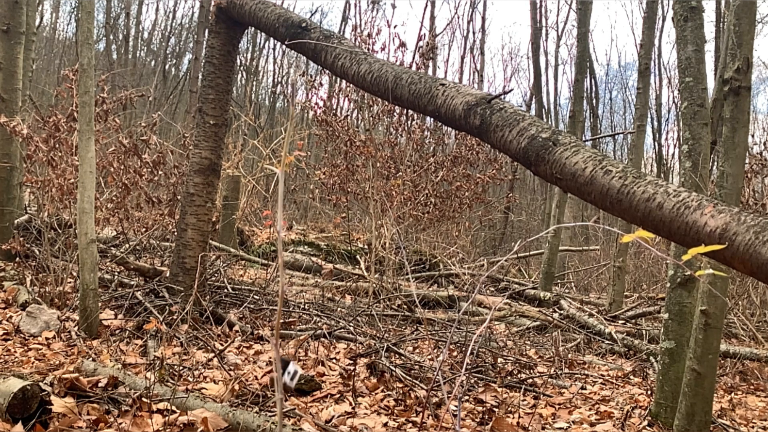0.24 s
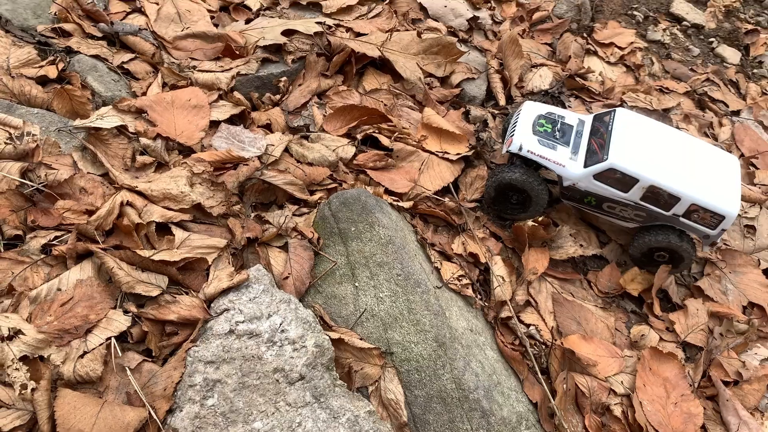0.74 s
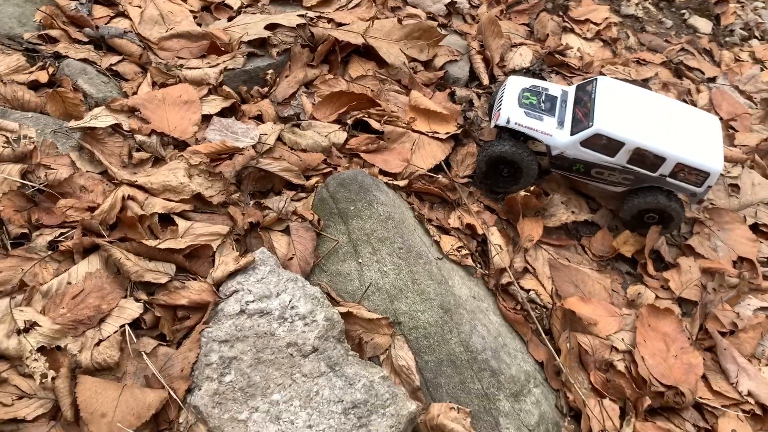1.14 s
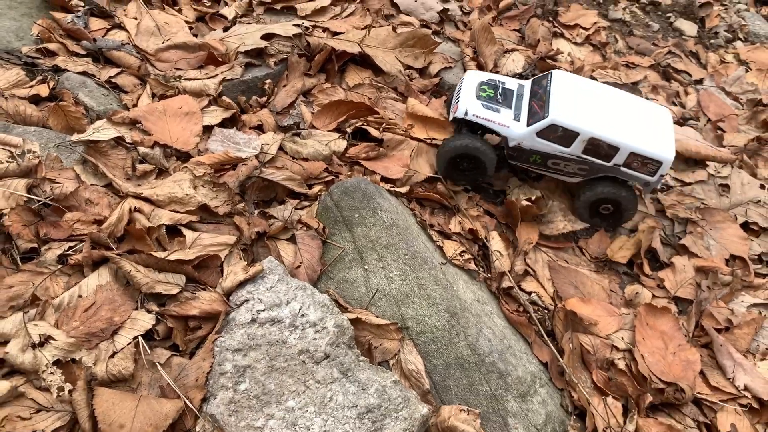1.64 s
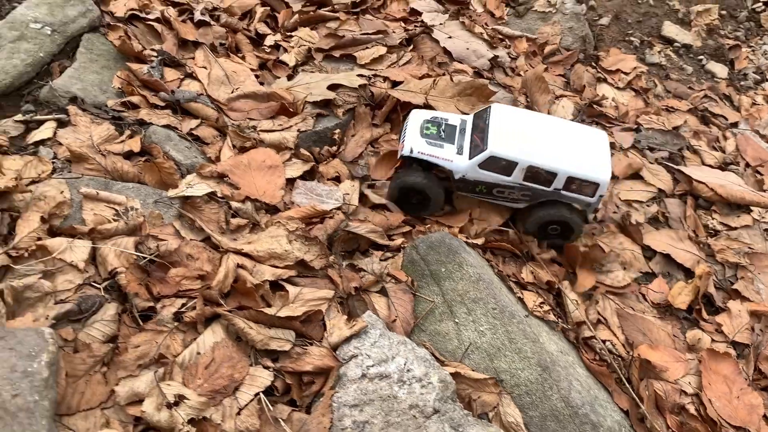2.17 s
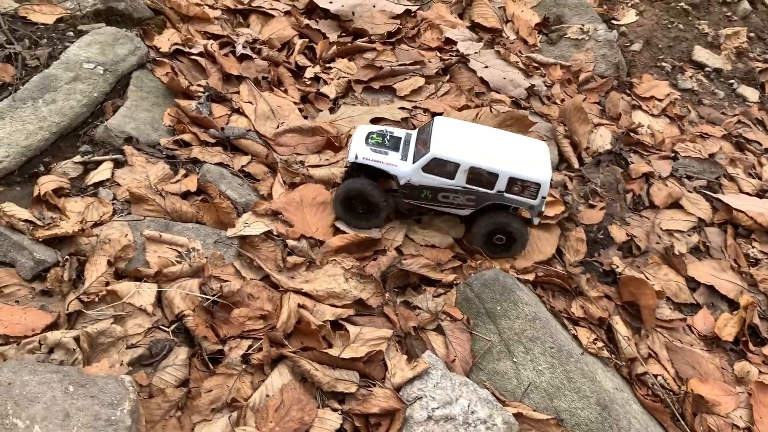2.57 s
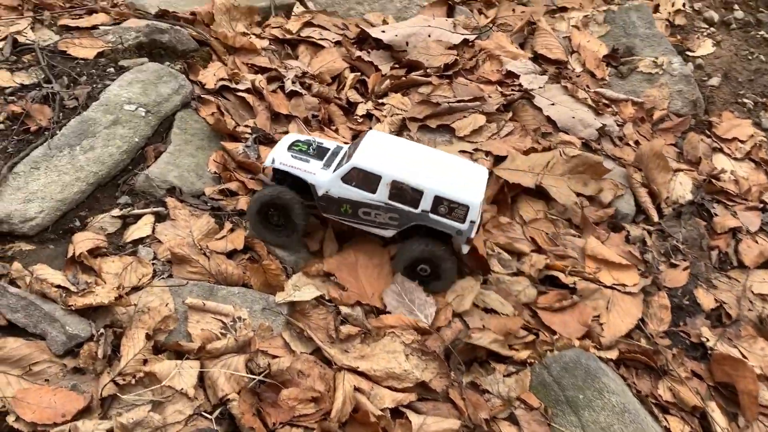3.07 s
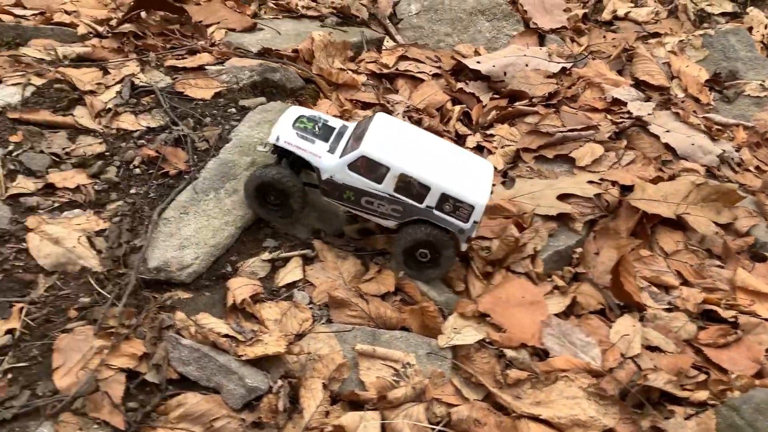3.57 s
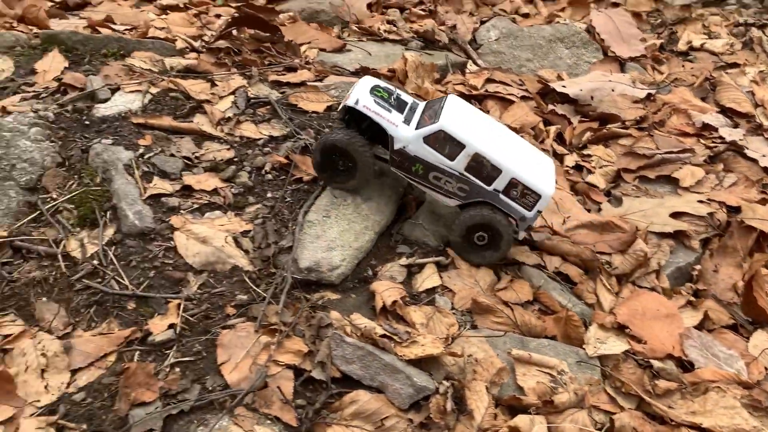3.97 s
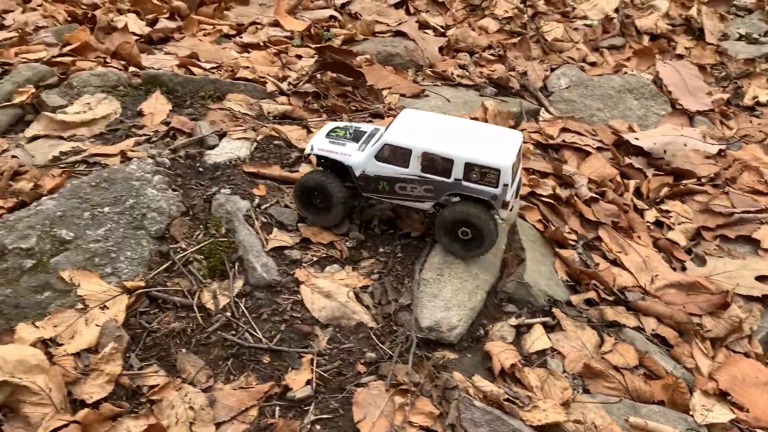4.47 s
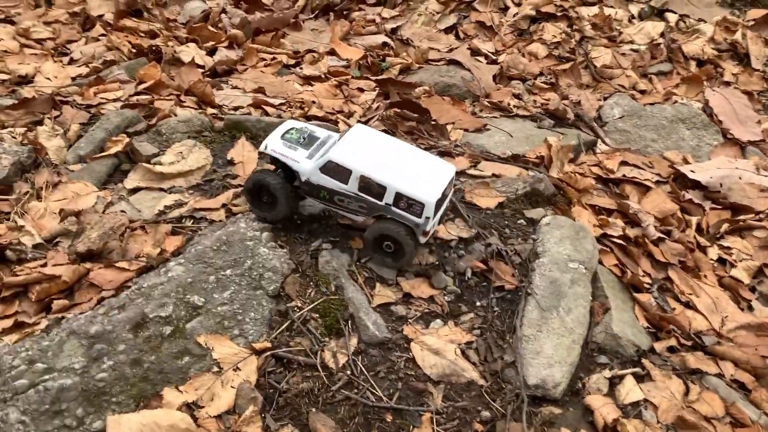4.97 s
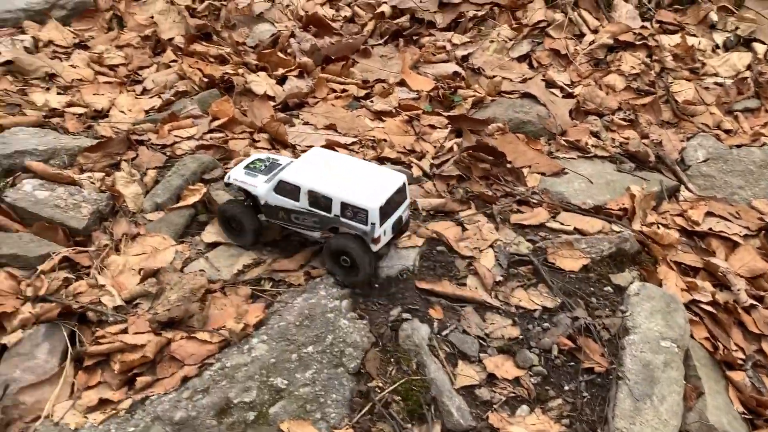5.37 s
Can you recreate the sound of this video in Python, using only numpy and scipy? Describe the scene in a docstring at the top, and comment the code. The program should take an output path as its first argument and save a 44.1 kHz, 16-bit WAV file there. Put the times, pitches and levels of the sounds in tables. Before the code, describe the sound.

A small remote-controlled truck whines and rasps as it crawls over crackling dry leaves and knocks against stones, over a low hum.

```python
"""First comes a soft gust among the trees, then a low engine-like hum and a few scuffs in the leaves.
Close by, a small radio-controlled truck sets off and crawls over dry leaves and stones. Its steering
squeals, its speed controller sings and its gear teeth whine and rasp. Motor speed sets the pitch and
strength of the whine and how hard the tyres crush the leaves. The wheels plough through leaf drifts
and thud on the ground, and the plastic chassis knocks on rock."""
import sys
import numpy as np
from scipy import signal
from scipy.fft import rfft, irfft, next_fast_len
from scipy.io import wavfile
from scipy.ndimage import uniform_filter1d, map_coordinates

SR = 44100
rng = np.random.default_rng(int(sys.argv[2]) if len(sys.argv) > 2 else 0)


def to_wav(s):
    """Save 16-bit WAV."""
    ch = np.atleast_2d(s).T  # columns
    pcm = np.round(np.clip(ch, -1, 1) * 32767)  # PCM
    wavfile.write(sys.argv[1], SR, pcm.astype(np.int16))


N = 247401
T = np.arange(N) / SR

# A COLOUR table says how strong the low and high parts of a sound are: pitch_hz, level_db
TREE_COLOUR = [(35, -48), (60, -7), (134, -2), (150, -13.5), (248, -5.5), (319, -11.5), (362, -10.5),
               (392, -13), (822, -9), (1060, -18), (1380, -7), (1670, -18.5), (1930, -12), (2440, -30),
               (2600, -102.5), (3380, -101), (5720, -120)]  # wind in the trees
BUFFET_COLOUR = [(4, 2.0), (10, 2.0), (25, -9.5), (60, -42.0), (200, -87)]  # air rocking the microphone
HUSH_COLOUR = [(25, -8), (70, 22), (200, 9), (450, -5.5), (620, -3.5), (800, 4), (1300, -3.5), (1700, -2),
               (2400, -16), (4000, -14.5), (6300, -22.5), (10000, -30.5), (15000, -33)]  # the quiet wood
RUMBLE_COLOUR = [(25, -32), (45, -11), (70, 16.5), (100, 0), (150, -0.5), (200, -1), (245, 5), (290, -4),
                 (350, -6), (440, -16), (900, -62)]  # rumble under the hum
LEAF_COLOUR = [(300, -52), (1500, -12), (4000, -33.5), (5600, -6), (6700, -2), (9000, 0.5), (11000, 0.5),
               (13000, 5), (14400, 1.5), (15500, 8), (15900, 1.5)]  # dry leaves breaking
SCRUB_COLOUR = [(100, -26), (400, 16), (800, 14), (1200, 4), (1600, 11), (2300, 12.5), (3000, 9.5),
                (3700, 10), (4700, 12.5), (5500, 12.5), (8000, -3), (16000, -40)]  # tyres rubbing over leaves
WHINE_COLOUR = [(500, 11), (1200, 24), (1750, 23.5), (2400, 22), (3000, 21.5), (3500, 20), (4100, 11),
                (4400, 15), (6000, -8), (16000, -18)]  # how the truck's shell gives off the whine
HISS_COLOUR = [(300, -53), (2400, -45), (3600, -13), (4400, -38), (4900, -16.5), (6800, -2), (7500, -3.5),
               (8000, 1), (8400, 0.5), (9000, 7.5), (10000, -3), (11000, -5), (16000, -6)]  # sliding gear teeth
SIZZLE_COLOUR = [(3000, -35), (7500, -23), (9500, -21), (10700, 18.5), (12000, -3), (13200, 7), (16000, 1)]  # fast-running teeth
CLATTER_COLOUR = [(300, -33), (750, -12.5), (1000, -4), (1220, 5.5), (1500, -8), (1800, -4), (2300, -48),
                  (2800, -64), (3600, -31), (4400, -35), (4900, -6), (7000, -14)]  # the hollow gearbox
# what the left side gains and the right side loses
LEFT_COLOUR = [(300, 0.92), (800, -0.85), (2200, 1.0), (3600, 0.74), (6500, 0.12), (16000, -0.14)]
# how the two microphone openings hear the truck: pitch_hz, left_lead_rad, likeness (0 to 1)
MIC_OPENINGS = [(100, 0, .9), (650, -1, .5), (1200, -.2, .9), (2100, -1.55, .6), (2900, -2.2, .6),
                (3450, -4.3, .55), (4200, -6, .35), (5200, -10.5, .4), (6200, -12.4, .55),
                (8000, -10.9, .92), (9200, -9.8, .99), (9700, -9.42, .997), (10200, -9, .99),
                (11000, -8.2, .93), (13000, -6.3, .92), (16000, -3.6, .84)]

HUM_LEVELS = [(0.62, -36.5, -42.5, -44.5), (1.15, -40, -43, -46), (1.9, -41.5, -47.5, -58.5),
              (2.8, -40.5, -55.5, -90), (3.9, -38.5, -51.5, -54.5), (4.6, -54.5, -50, -53.5),
              (5.61, -51, -50, -56.5)]  # parts of the hum: time_s, first_tone_db, second_tone_db, rumble_db
HOLLOW_TONES = [(243, -21), (284, -8.5)]  # overtones of the hum: pitch_hz, against_rumble_db
SERVO_TONES = [(4027, -64), (8054, -86), (13600, -70)]  # the steering squeal: pitch_hz, level_db
CONTROLLER_LEVEL = [(1.28, -71), (1.42, -53.5), (1.8, -52), (2.3, -58), (3.9, -59.5), (4.5, -57),
                    (5.61, -60)]  # the speed controller's song: time_s, level_db

SCUFFS = [(0.618, -71, -56), (0.844, -63, -53.5), (1.096, -58.5, -59), (1.28, -66, -56)]  # faint stirs in the leaves before setting off: peak_s, crush_db, scrub_db
LEAF_DRIFTS = [(1.412, 0.042, -50.5, -53), (1.663, 0.021, -29, -64), (2.163, 0.48, -36.5, -52),
               (2.263, 0.14, -31.5, -36.5), (2.453, 0.049, -47, -45.5), (2.663, 0.14, -33, -43.5),
               (2.884, 0.059, -30.5, -36.5), (3.337, 0.14, -32, -52), (3.527, 0.13, -42, -35),
               (4.06, 0.13, -36.5, -57), (4.548, 0.15, -34, -69), (5.001, 0.023, -36, -32.5),
               (5.137, 0.16, -38, -41.5)]  # wheels in piles of leaves: middle_s, half_length_s, crush_db, scrub_db
LEAF_SNAPS = [(0.841, -45), (0.868, -49), (1.343, -51), (1.4296, -24), (1.6233, -19.5), (1.646, -30),
              (1.658, -26), (1.6634, -22), (1.7528, -21), (1.832, -16.5), (1.896, -16), (1.936, -19.5),
              (2.022, -18), (2.103, -19), (2.151, -17), (2.315, -17), (2.6267, -13), (2.854, -17),
              (2.892, -10.5), (2.968, -16), (3.081, -25), (3.258, -16), (3.3605, -10), (4.151, -22),
              (4.8655, -20), (4.996, -12), (5.1515, -14)]  # leaves and twigs snapping: start_s, level_db
# tyres and chassis hitting the ground: start_s, level_db, pitch_hz, fade_s (time to fall by 60 dB)
THUDS = [(0.845, -32.5, 109, 0.086), (1.098, -31.5, 417, 0.0047), (2.869, -23, 460, 0.032),
         (2.872, -27, 329, 0.019), (2.875, -26.5, 118.5, 0.071), (3.429, -33.5, 486, 0.018),
         (3.435, -21.5, 164, 0.039), (3.544, -22.5, 179, 0.04), (3.694, -27.5, 313, 0.0096),
         (4.967, -28.5, 281, 0.026), (4.986, -27.5, 146, 0.083), (5.004, -27, 127, 0.047),
         (5.009, -23, 472, 0.0091), (5.01, -21, 88, 0.11)]
STONE_KNOCKS = [(0.854, -32, 3500), (1.102, -29, 590), (3.5364, -4.5, 9900), (3.539, -18, 2540),
                (3.6931, -8.5, 1340), (3.692, -11.5, 12000), (4.986, -22, 1180), (4.999, -25, 1000)]  # the chassis hitting stone: start_s, level_db, brightness_hz
CHASSIS_TONES = [(460, -11.5, 0.014), (700, -10.5, 0.019), (1060, 6, 0.0086), (1210, -5.5, 0.018),
                 (1870, 2, 0.023), (2210, 18, 0.0025), (3810, 9, 0.0034), (4960, 11.5, 0.011),
                 (5500, -8, 0.0026)]  # how the struck chassis rings: pitch_hz, level_db, fade_s

GEAR_PITCH = [(1.392, 995), (1.432, 1086), (1.507, 1693), (1.556, 1423), (1.626, 1255), (1.711, 1266),
              (1.806, 1151), (1.901, 1412), (1.936, 1683), (1.971, 1735), (2.035, 2048), (2.085, 2060),
              (2.125, 2330), (2.185, 2204), (2.23, 2255), (2.265, 2122), (2.295, 1874), (2.315, 1858),
              (2.355, 1972), (2.395, 1920), (2.484, 2057), (2.559, 2388), (2.609, 2350), (2.724, 1872),
              (2.784, 2057), (2.819, 2320), (2.859, 2425), (2.928, 2151), (2.983, 2424), (3.108, 2284),
              (3.218, 2327), (3.263, 2813), (3.307, 3079), (3.352, 2536), (3.392, 2650), (3.437, 2360),
              (3.472, 1830), (3.487, 1796), (3.667, 1698), (3.712, 1523), (3.786, 1758), (3.901, 1753),
              (3.936, 1635), (3.981, 1775), (4.016, 1760), (4.066, 2010), (4.106, 2014), (4.161, 2238),
              (4.176, 2140), (4.205, 1724), (4.26, 1773), (4.3, 1411), (4.36, 1873), (4.395, 1858),
              (4.435, 2189), (4.49, 2374), (4.57, 2863), (4.639, 3054), (4.704, 2496), (4.784, 2645),
              (4.829, 2470), (4.874, 2660), (4.909, 2383), (5.014, 2295), (5.039, 2375), (5.068, 2624),
              (5.108, 2507), (5.148, 2776), (5.213, 2730), (5.258, 2840), (5.288, 2816), (5.323, 2514),
              (5.343, 2470), (5.393, 2542), (5.473, 3170), (5.522, 2428), (5.562, 2660), (5.612, 2305)]  # motor speed, as the rate at which gear teeth meet: time_s, pitch_hz
SLACK_MOMENTS = [(3.63, 0.047, 15), (4.302, 0.015, 4.5)]  # a wheel hangs in the air: middle_s, half_length_s, drop_db
CASING_RINGS = [(3080, 200, -6), (3430, 240, 0), (3680, 170, -3), (4020, 240, -13)]  # where the gearbox casing rings: pitch_hz, width_hz, level_db
CASING_LEVEL = [(1.5, -50.5), (1.62, -55), (1.85, -54), (1.96, -50), (2.06, -39.5), (2.14, -44.5),
                (2.25, -41), (2.5, -52), (3.0, -44), (3.3, -44), (3.75, -50), (3.9, -58), (4.1, -44.5),
                (4.19, -45.5), (4.24, -49), (4.29, -49), (4.34, -44), (4.44, -46.5), (4.58, -38),
                (4.82, -51.5), (5.1, -41.5), (5.6, -49)]  # the casing's grinding: time_s, level_db
CHATTER_TONES = [(2, 0), (3, -4.5)]  # overtones that shake the casing: gear_pitch_multiple, level_db
HISS_LEVEL = [(1.43, -45.5), (1.51, -38.5), (1.57, -44.5), (1.85, -42.5), (2.0, -41.5), (2.27, -35),
              (2.38, -38), (2.44, -36), (2.6, -36.5), (2.9, -33), (3.06, -32.5), (3.45, -35), (3.75, -38.5),
              (3.97, -34.5), (4.08, -43), (4.19, -35), (4.57, -36), (4.63, -38.5), (4.7, -32.5),
              (4.8, -42.5), (4.92, -35.5), (5.1, -39), (5.38, -48.5), (5.6, -39.5)]  # gear hiss as the truck lurches and turns: time_s, level_db
GEARBOX_RINGS = [(4910, 160, -11), (5420, 150, -13), (7850, 300, -3), (8200, 340, 0)]  # high rings set off by sliding teeth: pitch_hz, width_hz, level_db
SQUEAK_RING = [(4330, 220, 0)]  # a thin ring in the drive: pitch_hz, width_hz, level_db
SQUEAK_LOUDNESS = [(1.44, -51.5), (1.56, -50.5), (1.68, -59), (2.3, -56), (3.1, -52), (3.9, -49),
                   (4.6, -52.5), (5.6, -68)]  # strength of that ring: time_s, level_db
WHINE_TONES = [(1, 0), (2, -8), (3, -14)]  # the whine and its overtones: gear_pitch_multiple, level_db
# extra tones from the off-centre pinion (the motor's small gear): offset_in_turn_rates, level_db
SIDE_TONES = [(-3, -15), (-1, -17), (1, -7.5), (3, -23)]
CRUISE_WHINE_LEVEL = [(1.5, -55), (1.65, -45.5), (1.8, -50), (1.98, -50.5), (2.2, -60.5), (2.8, -52.5),
                      (3.1, -47), (3.35, -45), (3.85, -44), (4.25, -47.5), (4.5, -46.5), (4.85, -47),
                      (5.4, -46)]  # the whine's strength at cruising speed: time_s, level_db

CRUISE_HZ, PINION_TEETH = 2000, 9  # gear pitch at cruising speed; teeth on the motor's gear


def amp(db):
    """Turn decibels into a number to multiply by."""
    return 10 ** (np.asarray(db) / 20)


def unit(x):
    """Scale a sound to an average strength (rms) of 1."""
    return x / np.sqrt(np.mean(x ** 2) + 1e-20)


def curves(rows):
    """Join a table's points over time: one smooth line for each column after the first."""
    times, *columns = np.transpose(rows)
    return [np.interp(T, times, column) for column in columns]


def wobble(rate):
    """A smooth random curve through `rate` new values a second."""
    return map_coordinates(rng.standard_normal(N // 32), [T * rate], mode="wrap")


def phase_of(pitch_hz):
    """Add up a changing pitch into the angle of its wave."""
    return 2 * np.pi * np.cumsum(pitch_hz) / SR


def filtered(x, response):
    """Multiply each frequency in a sound by response(hz)."""
    size = next_fast_len(N + 8192)
    return irfft(rfft(x, size) * response(np.fft.rfftfreq(size, 1 / SR)), size)[..., :N]


def colour(x, points):
    """Shape the lows and highs of a sound with a COLOUR table."""
    pitch_hz, db = np.transpose(points)
    return filtered(x, lambda hz: amp(np.interp(np.log(hz + 1), np.log(pitch_hz), db)))


def patchy(x, depth_db):
    """Shift the colour at random, as when the truck turns and new leaves come under it."""
    spectrum = signal.stft(x, nperseg=512)[2]
    patches = uniform_filter1d(rng.standard_normal(spectrum.shape), size=5, axis=0)
    patches = uniform_filter1d(patches, size=12, axis=1)
    return unit(signal.istft(spectrum * amp(depth_db * unit(patches)), nperseg=512)[1][:N])


def resonate(x, rings):
    """Let a sound ring at a few pitches that drift by about half a percent."""
    def response(f):
        return sum(amp(db) * (1j * f * width / (hz * hz - f * f + 1j * f * width)) ** 2
                   for hz, width, db in rings)
    drifting_clock = np.cumsum(1 + .005 * wobble(11))
    return unit(map_coordinates(filtered(x, response), [drifting_clock], mode="mirror"))


def air(points, width):
    """Coloured stereo noise; more width makes left and right less alike."""
    mid, side = colour(rng.standard_normal((2, N)), points)
    return unit(np.array([mid + width * side, mid - width * side]))


def add(track, start_s, sound):
    """Mix a sound into a track at the given time."""
    part = track[max(round(start_s * SR), 0):][:len(sound)]
    part += sound[:len(part)]


def grains(rate, spread_db, fade_s):
    """Tiny cracks at random times, about `rate` a second: many faint, a few strong."""
    sizes = amp(spread_db * np.minimum(rng.exponential(size=N), 5)) * (rng.random(N) < rate / SR)
    fade = amp(-120 * T[:SR // 50] / fade_s)
    power = np.abs(signal.fftconvolve(sizes ** 2, fade)[:N])
    return unit(np.sqrt(power) * rng.standard_normal(N))


def gust(peak_s=0.048):
    """A soft gust rises and dies away in the trees, while air rocks at the microphone."""
    swell_db = np.minimum(127 * (T - peak_s), 86 * (peak_s - T))
    buffet = air(BUFFET_COLOUR, width=0.14) * amp(-45)
    rush = air(TREE_COLOUR, width=0.85) * (amp(-40 + swell_db) + amp(-59))
    return rush + buffet


def hush():
    """The steady, soft noise of the wood all around."""
    return air(HUSH_COLOUR, width=1.0) * amp(-48)


def hum(firing_hz=65.5):
    """An engine-like drone: three firing tones and two hollow overtones above a throbbing rumble."""
    first_db, second_db, rumble_db = curves(HUM_LEVELS)
    phase = phase_of(firing_hz * (1 + .024 * wobble(22)))
    first = amp(first_db + 1.7 * wobble(23)) * np.sin(phase)
    second = amp(second_db + 0.82 * wobble(8.1)) * np.sin(2 * phase)
    third = amp(rumble_db - 5.5 + 2.2 * wobble(10)) * np.sin(3 * phase)
    hollow = sum(amp(rumble_db + db + 3 * wobble(14)) * np.sin(2 * np.pi * hz * T + .7 * wobble(16))
                 for hz, db in HOLLOW_TONES)
    rumble = air(RUMBLE_COLOUR, width=.45) * amp(rumble_db + 3.6 * np.sin(phase))
    return (first + second + third + hollow + rumble) * amp([[1.1], [-1.1]])  # a little to the left


def drive(start_s=1.446):
    """The motor's state: gear pitch, speed (in doublings above cruising) and load."""
    gear_hz, = curves(GEAR_PITCH)
    load_db = -420 * np.maximum(start_s - T, 0)  # rises quickly until the truck sets off
    for middle_s, half_s, drop_db in SLACK_MOMENTS:
        load_db -= drop_db * np.exp(-((T - middle_s) / half_s) ** 2)
    return gear_hz, np.log2(gear_hz / CRUISE_HZ), load_db


def servo(peak_s=1.155):
    """The little steering motor squeals thinly just before the truck sets off."""
    swell = amp(np.minimum(220 * (T - peak_s), 70 * (peak_s - T)))
    return swell * sum(amp(db) * unit(np.sin(phase_of(hz * (1 + .03 * wobble(1100)))))
                       for hz, db in SERVO_TONES)


def controller(pitch_hz=1005.5, start_s=1.2):
    """Current switched on and off makes the motor's coils sing at one steady pitch."""
    phase = 2 * np.pi * pitch_hz * T + .15 * wobble(90)
    tone = np.sin(phase) + amp(-14) * np.sin(3 * phase) + amp(-13) * np.sin(5 * phase)
    return unit(tone) * amp(curves(CONTROLLER_LEVEL)[0] + 1.5 * wobble(9)) * (T > start_s)


def rustle(scuff_rise_s=.008, scuff_fade_s=.31):
    """Tyres crush the leaves and scrub over them, harder with speed and in drifts."""
    _, speed, load_db = drive()
    ground_db = load_db + 1.6 * wobble(28)
    crush_power = amp(-46.5 + 12 * speed + ground_db) ** 2
    scrub_power = amp(-56 + 11 * speed + ground_db) ** 2
    swells = [(-19 * np.abs((T - s) / half_s) ** 1.23, crush_db, scrub_db)
              for s, half_s, crush_db, scrub_db in LEAF_DRIFTS]
    swells += [(-60 * np.abs(T - s) / np.where(T < s, scuff_rise_s, scuff_fade_s), crush_db, scrub_db)
               for s, crush_db, scrub_db in SCUFFS]
    for shape_db, crush_db, scrub_db in swells:
        crush_power += amp(crush_db + shape_db) ** 2
        scrub_power += amp(scrub_db + shape_db) ** 2
    crush = patchy(colour(grains(rate=1600, spread_db=2.2, fade_s=.003), LEAF_COLOUR), depth_db=1.2)
    scrub = unit(colour(grains(rate=5600, spread_db=1.7, fade_s=.023), SCRUB_COLOUR))
    return crush * np.sqrt(crush_power) + scrub * np.sqrt(scrub_power)


def snaps(fade_s=.0064):
    """Stiff leaves and twigs break, each with one short burst of noise."""
    out, t = np.zeros(N), T[:SR // 50]
    for start_s, db in LEAF_SNAPS:
        burst = rng.standard_normal(len(t)) * amp(-60 * t / fade_s)
        add(out, start_s, amp(db) * burst / np.abs(burst).max())
    return colour(out, LEAF_COLOUR)


def thuds():
    """Tyres drop off stones and thud; the deepest thuds reach left and right most nearly in step."""
    out, t = np.zeros((2, N)), T[:SR // 4]
    for start_s, db, hz, fade_s in THUDS:
        skew_rad = 0.74 * min(hz / 139, 1) ** 2
        shape = amp(-60 * t / fade_s) * (1 - np.exp(-t / 0.00076))
        for track, offset in zip(out, (-skew_rad, skew_rad)):
            thud = np.sin(2 * np.pi * hz * t + offset) * shape
            add(track, start_s, amp(db) * thud / np.abs(thud).max())
    return out * amp([[1.5], [-1.5]])  # a little to the left


def knocks():
    """Plastic meets stone: a crack and a short ring, duller for a softer touch."""
    out, t = np.zeros(N), T[:SR // 10]
    for start_s, db, brightness_hz in STONE_KNOCKS:
        ring = sum(amp(tone_db + rng.normal(0, 1.5) - 60 * t / fade_s)
                   * np.sin(2 * np.pi * (hz * t + rng.random()))
                   for hz, tone_db, fade_s in CHASSIS_TONES)
        crack = rng.standard_normal(len(t)) * (2.75 * amp(-60 * t / .005) + .08 * amp(-60 * t / .07))
        dullness = np.exp(-2 * np.pi * brightness_hz / SR)
        hit = signal.lfilter([1], [1, -dullness], (ring + crack) * (1 - np.exp(-t / 0.0003)))
        add(out, start_s, amp(db) * hit / np.abs(hit).max())
    return out


def casing_grind(phase, pinion_swell, rub):
    """Rubbing keeps the gearbox casing ringing; it swells when a gear overtone sweeps past a ring."""
    chatter = sum(amp(db) * np.sin(k * phase + .7 * wobble(700)) for k, db in CHATTER_TONES)
    shaken = resonate(chatter * amp(3 * wobble(300) + 3 * pinion_swell), CASING_RINGS)
    rubbed = amp(-3) * patchy(resonate(rub, CASING_RINGS), depth_db=4)
    return unit(shaken + rubbed) * amp(curves(CASING_LEVEL)[0])


def gear_rasp(phase, speed):
    """Teeth scrape once a tooth and swell once a pinion turn, making the gearbox hiss and ring."""
    pinion_swell = np.sin(phase / PINION_TEETH)
    scraping = np.array([grains(rate=3500, spread_db=1.2, fade_s=.004) for _ in range(4)])
    pulse_db = 2.1 * np.sin(phase) + 1.8 * pinion_swell + 0.44 * wobble(70)
    hiss, sizzle, clatter, rub = scraping * amp(pulse_db)
    grind = casing_grind(phase, pinion_swell, rub)
    hiss_db, = curves(HISS_LEVEL)
    layers = [(hiss, HISS_COLOUR, hiss_db + .7 * wobble(12)),
              (sizzle, SIZZLE_COLOUR, -43 + 8 * speed),
              (clatter, CLATTER_COLOUR, -45)]
    scrape = sum(patchy(colour(noise, shape), depth_db=3) * amp(db) for noise, shape, db in layers)
    rings = patchy(resonate(rub, GEARBOX_RINGS), depth_db=4) * amp(hiss_db - 3.5)
    squeak = resonate(rub, SQUEAK_RING) * amp(curves(SQUEAK_LOUDNESS)[0])
    return .8 * scrape + rings + squeak + grind


def gear_whine(phase, gear_hz, speed):
    """Teeth meet many times a second and whine; the slack between them blurs each tone."""
    pace = gear_hz / CRUISE_HZ
    tones = sum(amp(db + 2.5 * wobble(30)) * np.sin(k * phase + .27 * np.sqrt(k) * pace * wobble(450))
                for k, db in WHINE_TONES)
    turn = phase / PINION_TEETH
    side_tones = sum(amp(db + 3.5 * wobble(16)) * np.sin(phase + k * turn + 1.2 * wobble(90))
                     for k, db in SIDE_TONES)
    flutter_db = (2.4 * wobble(150) + 2.4 * wobble(40)) * pace  # faster teeth run less evenly
    whine = unit(colour((tones + side_tones) * amp(flutter_db), WHINE_COLOUR))
    return whine * amp(curves(CRUISE_WHINE_LEVEL)[0] + 9.5 * speed)


def gears():
    """The motor turns the gears a little unevenly; their whine and rasp both grow with the load."""
    gear_hz, speed, load_db = drive()
    phase = phase_of(gear_hz * (1 + .012 * wobble(60) + .014 * wobble(600)))
    return gear_whine(phase, gear_hz, speed) * amp(load_db / 2), gear_rasp(phase, speed) * amp(load_db)


def to_stereo(clear, spread):
    """Left and right hear the truck out of step; the ground scatters part of `spread` to each."""
    pitch_hz, left_lead_rad, likeness = np.transpose(MIC_OPENINGS)
    hz, _, spectrum = signal.stft(spread, SR, nperseg=128)
    shared = np.interp(hz, pitch_hz, likeness)[:, None]
    direct = clear + signal.istft(spectrum * np.sqrt(shared), nperseg=128)[1][:N]
    random_phase = np.exp(2j * np.pi * rng.random((2, *spectrum.shape)))
    scatter = signal.istft(spectrum * np.sqrt(2 * (1 - shared)) * random_phase, nperseg=128)[1]
    scatter = np.pad(scatter, ((0, 0), (40, 0)))[:, :N]  # arrives 40 samples later
    half_each_way = np.array([[.5j], [-.5j]])
    pair = filtered(direct, lambda f: np.exp(half_each_way * np.interp(f, pitch_hz, left_lead_rad)))
    left, right = pair + scatter
    return np.array([colour(left, LEFT_COLOUR), colour(right, [(f, -db) for f, db in LEFT_COLOUR])])


def scene(hum_start_s=0.62):
    """The gust first, then the truck over the hum and the hush of the wood."""
    fade_in = np.clip((T - hum_start_s) / 0.008 + .5, 0, 1)
    whine, rasp = gears()
    hits = knocks()
    clear = .55 * whine + controller() + servo() + .75 * hits
    spread = .45 * whine + rasp + rustle() + snaps() + .25 * hits
    truck = to_stereo(clear, spread) + thuds()
    return truck + fade_in * (hum() + hush()) + (1 - fade_in) * gust()


def record(dry, top_hz=15830):
    """Cut away the very highest treble."""
    return filtered(dry, lambda hz: hz < top_hz)


dry = scene()
out = record(dry)
to_wav(out)
```